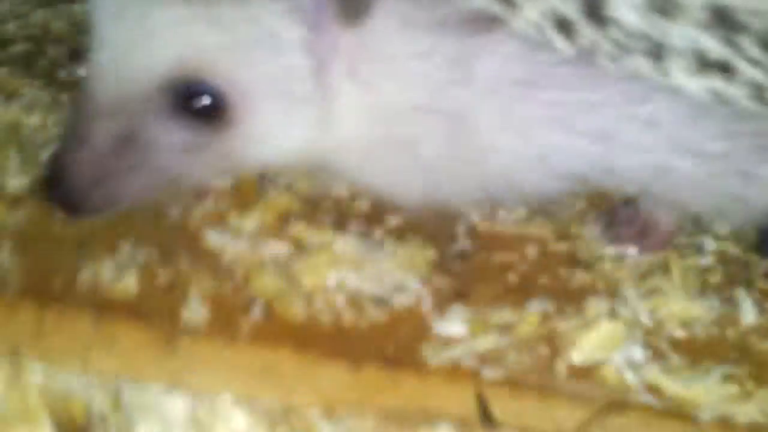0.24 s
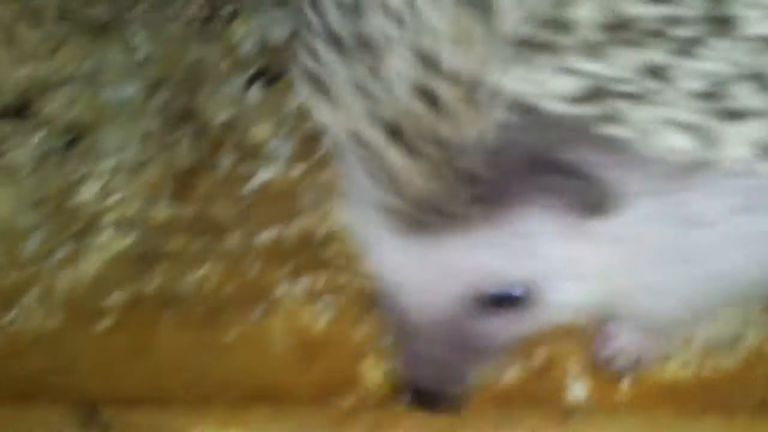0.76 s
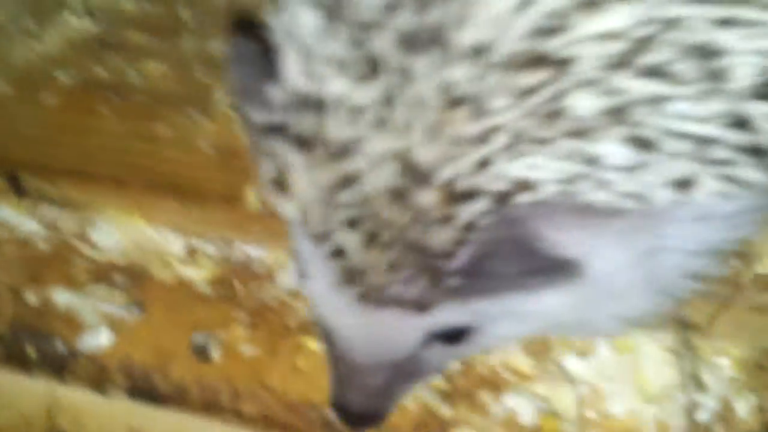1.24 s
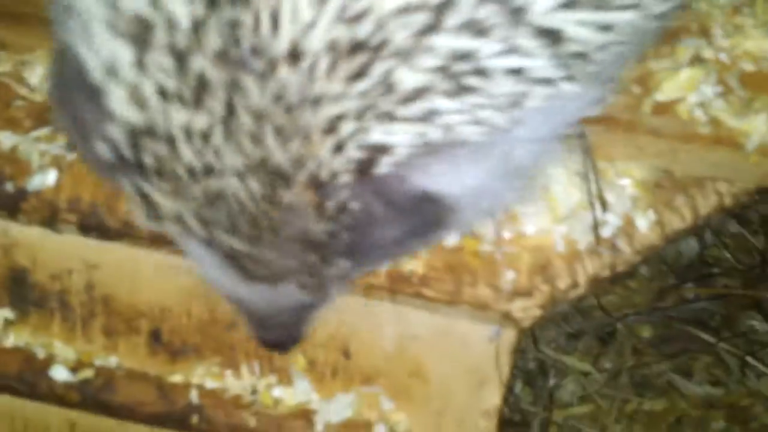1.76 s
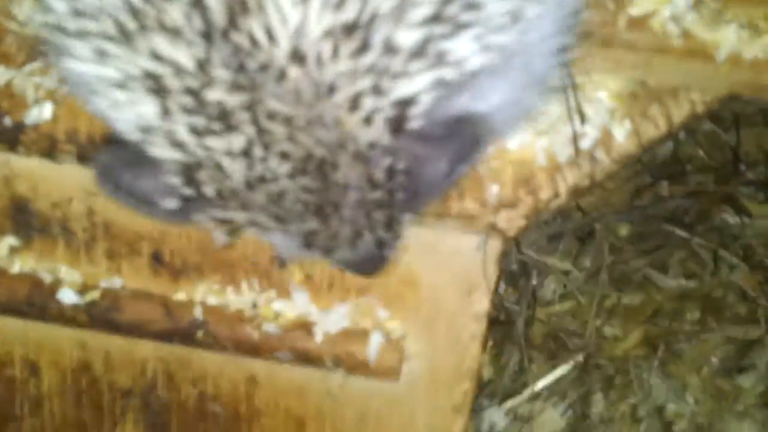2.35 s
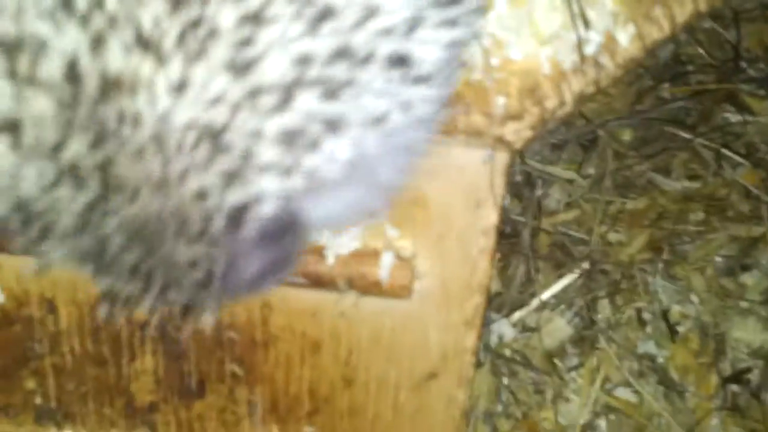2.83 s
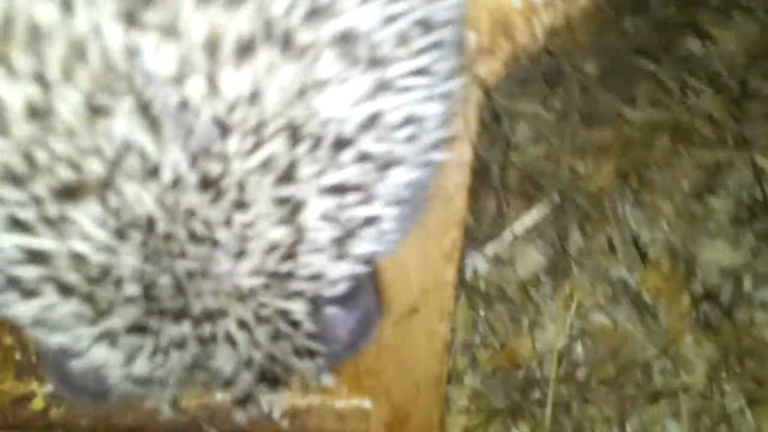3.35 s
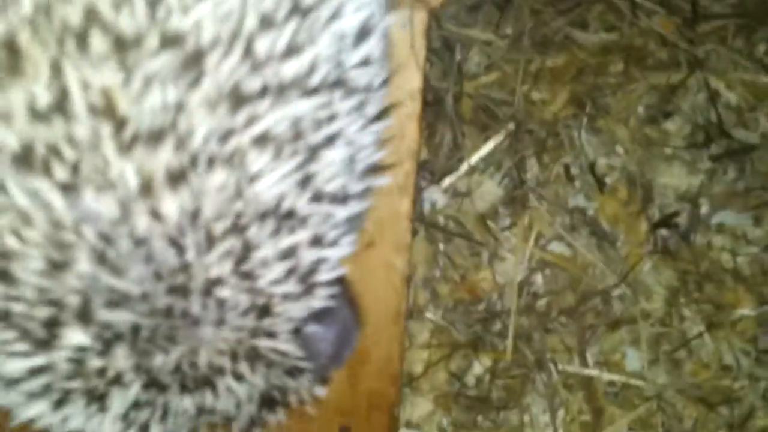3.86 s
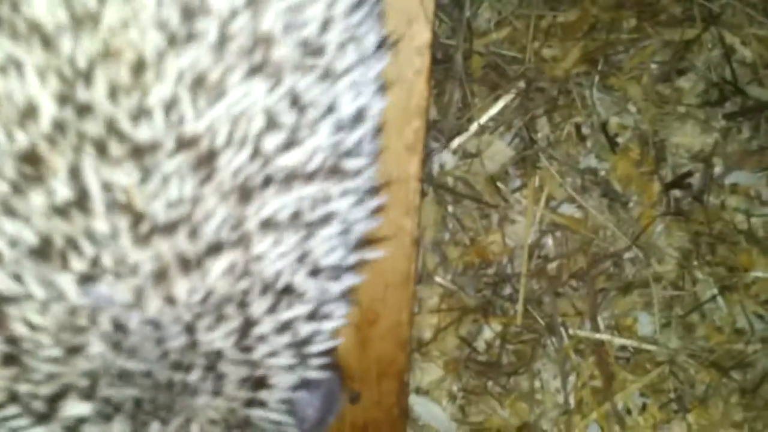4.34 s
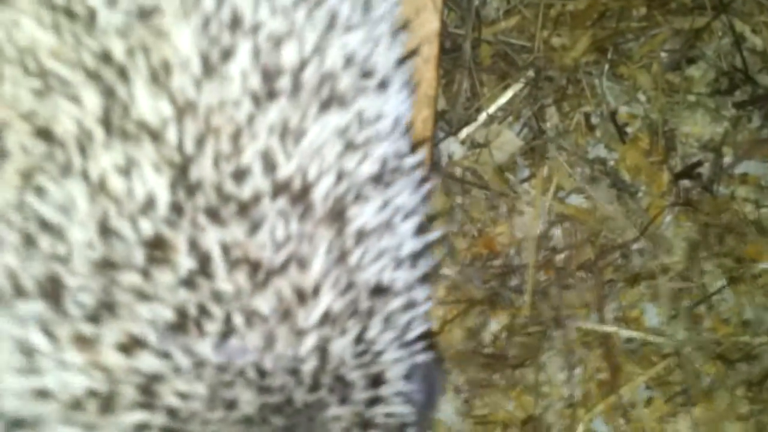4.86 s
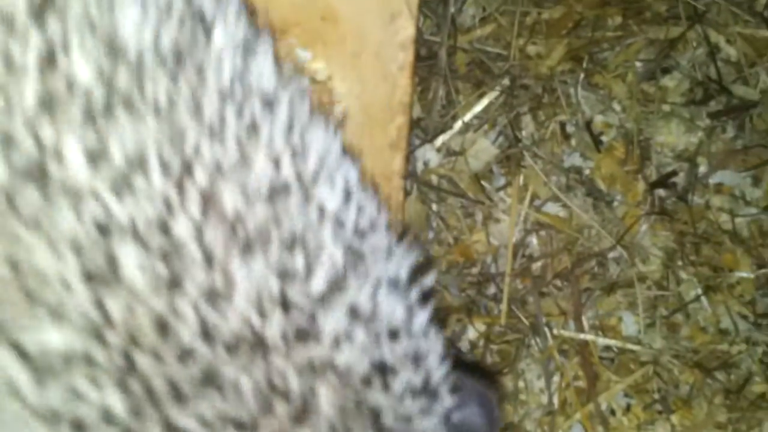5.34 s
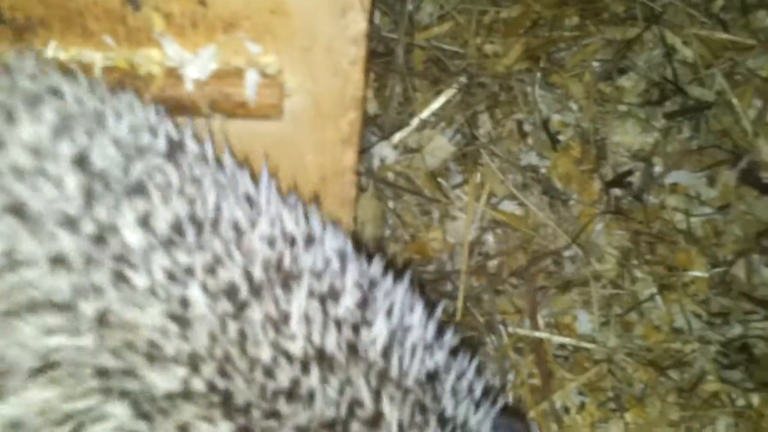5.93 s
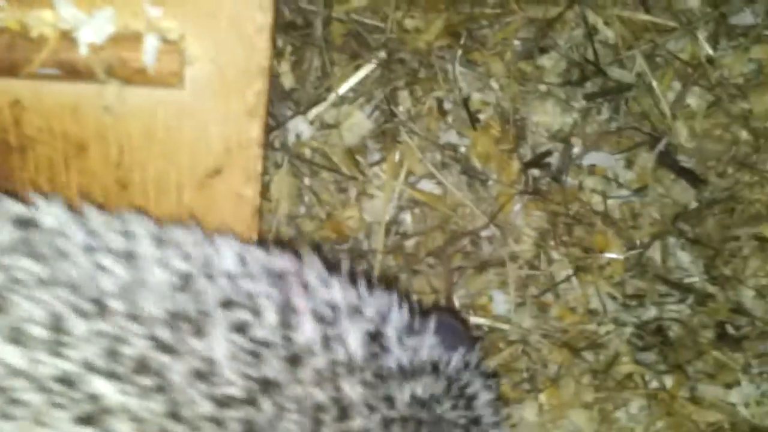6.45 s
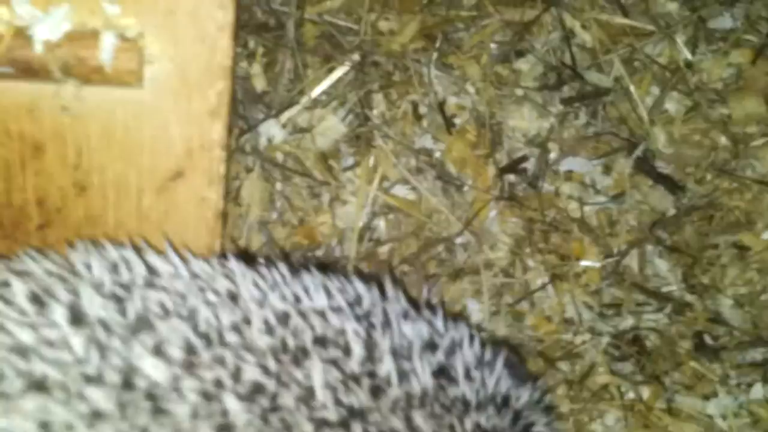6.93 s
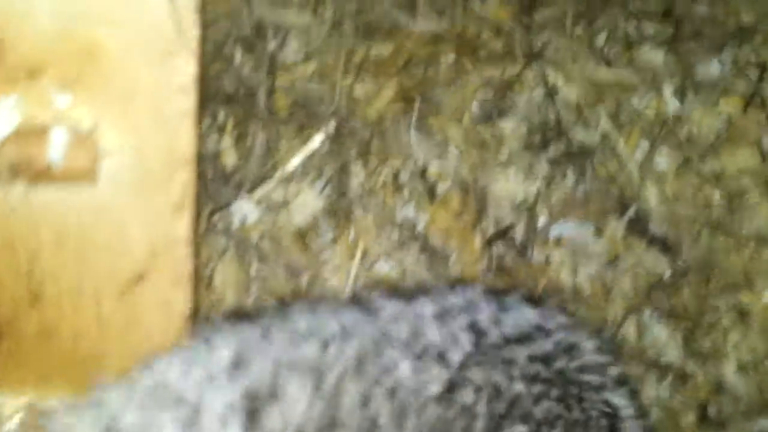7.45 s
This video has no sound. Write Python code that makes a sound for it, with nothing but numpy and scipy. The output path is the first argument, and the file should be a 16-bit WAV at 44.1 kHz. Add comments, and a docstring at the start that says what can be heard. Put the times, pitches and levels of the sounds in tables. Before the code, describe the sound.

A hedgehog stirs in dry wood shavings, making light crackles and small snaps. After about two and a half seconds it moves down a hollow wooden ramp, and irregular knocks, dragging scuffs and claw scratches join the rustling. Near the end, hay and chips snap in a quick cluster. The microphone is close, in a small pen with short echoes and a faint steady hiss.

```python
"""Hedgehog on a wooden ramp

A hedgehog shuffles down a hollow wooden ramp strewn with shavings, close to a two-port microphone.
Its weight drags and knocks on the board and makes it ring, its claws scratch it, and dry shavings
and hay rustle and snap. The walls of the pen add short echoes over a faint, steady hiss."""
import sys
import numpy as np
from scipy import signal
from scipy.io import wavfile
from scipy.ndimage import uniform_filter1d

SR = 44100
rng = np.random.default_rng(int(sys.argv[2]) if len(sys.argv) > 2 else 0)


def pcm_store(signal):
    """Save signal as 16-bit PCM."""
    levels = np.round(np.clip(np.atleast_2d(signal), -1, 1) * 32767)
    wavfile.write(sys.argv[1], SR, levels.astype(np.int16).T)


N = 339129
LEFT_LAG = 11  # samples by which the left port hears the animal later
WEIGHT, CLAWS, RUSTLE = range(3)  # the three parts of a scuff
# the notes (modes) of the hollow board: f/Hz, level/dB, time to fade 60 dB when left free/s
BOARD_MODES = [(129, -15.5, 0.95), (225.3, 2.5, 0.42), (255, 2.5, 0.58), (338.6, 3, 0.37), (397, 2.5, 0.42),
               (460.8, 5, 0.17), (578, -2, 0.56), (666.6, 5.5, 0.2), (739, 3, 0.25), (905, 9.5, 0.045),
               (985, -1.5, 0.3), (1196, -14.5, 0.25), (1305, -1.5, 0.13)]


def gain_of(db):
    """Turns decibels into a gain."""
    return 10 ** (np.asarray(db) / 20)


def unit_rms(x):
    """Scales a signal to an average power of 1."""
    return x / np.sqrt(np.mean(x ** 2) + 1e-20)


def value_at(points, hz):
    """Looks up a table of frequencies and values at hz."""
    f, value = np.transpose(points)
    return np.interp(np.log(hz + 1), np.log(f + 1), value)


def add(mix, start_s, sound):
    """Lays a two-channel sound into the mix."""
    part = mix[:, round(start_s * SR):][:, :sound.shape[1]]
    part += sound[:, :part.shape[1]]


def ports(common, own, share):
    """The right port hears the common sound; the left hears it late, mixed with a sound of its own."""
    return np.array([share * np.roll(common, LEFT_LAG) + np.sqrt(1 - share ** 2) * own, common])


def wander(size):
    """A random curve that changes over about size samples."""
    return unit_rms(uniform_filter1d(uniform_filter1d(rng.standard_normal(N), size), size))


def clumps(size, depth_db):
    """Stick and slip: a random gain that jumps up and sags over about size samples."""
    jumps = rng.random(N) * (rng.random(N) < 1 / size)
    sagging = unit_rms(signal.lfilter([1], [1, -np.exp(-1 / size)], jumps))
    return unit_rms(gain_of(depth_db * np.fmin(sagging, 2)))


def slips(per_s, spread_db, count):
    """Rows of tiny random clicks, most small and a few large."""
    size = gain_of(spread_db * np.fmin(rng.exponential(1, (count, N)), 4))
    return unit_rms(size * rng.choice([-1., 1.], (count, N)) * (rng.random((count, N)) < per_s / SR))


def gliding_ring(x, hz, width_hz, order):
    """Makes x ring at a pitch that follows the curve hz."""
    turn, decay = np.exp(2j * np.pi * np.cumsum(hz) / SR), np.exp(-np.pi * width_hz / SR)
    return 2 * (turn * signal.lfilter([(1 - decay) ** order], np.poly([decay] * order), x / turn)).real


def chip_band(x, hz):
    """Keeps a broad band around the pitch of a wood chip."""
    angle = 2 * np.pi * hz / SR
    decay = np.exp(-angle)
    return np.sqrt(1 - decay) * signal.lfilter([1, 0, -1], [1, -2 * decay * np.cos(angle), decay ** 2], x)


def effort_db(part, delayed=True):
    """How hard the weight, claws or rustle act at each sample: the body's stir plus all paw scuffs."""
    # low stir of the body between scuffs: t/s, level on the board/dB, level in the shavings/dB
    stir = [(0.0, -68, -52.5), (.2, -72, -56), (0.239, -70, -75), (.75, -101, -103), (1.0, -64.5, -69),
            (2.75, -63.5, -65), (3.4, -58.5, -64), (4.3, -59, -61), (5.4, -59, -66), (5.746, -53.5, -61),
            (6.4, -73, -67), (6.95, -58.5, -57.5), (7.45, -65, -62), (7.69, -59, -62.5)]
    # paws scuffing the board: start/s, length before stretching/s, weight/dB, claws/dB, rustle/dB
    scuffs = [(0.338, 0.13, -63, -60, -60.5), (0.439, 0.11, -59, -62, -55), (0.587, 0.075, -85, -87, -51.5),
              (0.836, 0.14, -59.5, -71, -58), (1.275, 0.064, -58.5, -55.5, -68),
              (1.499, 0.022, -53, -55.5, -61), (1.924, 0.03, -51, -54, -68),
              (1.958, 0.13, -49.5, -52, -53.5), (2.935, 0.06, -39.5, -41.5, -54),
              (3.037, 0.12, -40, -54.5, -80), (3.167, 0.016, -43.5, -50, -54),
              (3.206, 0.1, -44, -45.5, -54), (3.487, 0.061, -45, -53, -57.5),
              (3.556, 0.051, -39, -40.5, -56), (3.634, 0.1, -39, -50.5, -78), (3.746, 0.11, -52, -56, -55),
              (3.777, 0.49, -46, -55, -74), (3.938, 0.034, -38, -41, -51),
              (4.358, 0.098, -45.5, -48.5, -80), (4.482, 0.17, -51.5, -53.5, -49.5),
              (4.585, 0.057, -46, -38.5, -50), (4.888, 0.077, -42.5, -39.5, -50),
              (5.078, 0.13, -45, -60, -53), (5.165, 0.12, -38.5, -43.5, -48),
              (5.245, 0.065, -46, -42.5, -43.5), (5.466, 0.12, -45.5, -50.5, -52.5),
              (5.799, 0.12, -46, -46, -56.5), (5.974, 0.076, -51, -45.5, -55),
              (6.035, 0.098, -38, -40, -48.5), (6.1, 0.24, -48, -52.5, -52), (6.277, 0.089, -44, -41, -59),
              (6.4, 0.39, -49.5, -52, -51), (6.548, 0.1, -42.5, -44.5, -64),
              (6.775, 0.072, -44.5, -49.5, -51), (6.859, 0.1, -46, -53.5, -61.5),
              (7.155, 0.13, -54.5, -57, -62)]
    # factors that stretch a scuff's length: weight, claws, rustle
    stretch = [1.12, 0.79, 0.85]
    # the board answers a little after the shavings: weight/s, claws/s, rustle/s
    delay_s = [0.0024, 0.02, 0.0]
    # a paw first grips this far under its peak: weight/dB, claws/dB, rustle/dB
    grip_db = [-5.5, -9, -14]
    t = np.arange(0, N / SR + .01, .001)
    when, board_db, chips_db = np.transpose(stir)
    power = gain_of(2 * np.interp(t, when, [board_db, board_db - 4, chips_db][part]))
    for start, length, *levels_db in scuffs:
        age, span = t - start, length * stretch[part]
        peak_s = 0.29 * span + delayed * delay_s[part]
        rise_db = grip_db[part] * (1 - age / peak_s) ** 2
        fall_db = -14.5 * abs((age - peak_s) / span) ** 1.31  # holds first, then stops quickly
        shape_db = np.where(age < peak_s, rise_db, fall_db)
        power += (age >= 0) * gain_of(2 * (levels_db[part] + shape_db))
    return np.interp(np.arange(N) / SR, t, 10 * np.log10(power))


def hiss():
    """Steady room air and microphone noise, gently patchy."""
    # tone colour of the hiss: f/Hz, relative level/dB
    colour = [(49, -20.5), (110, 5), (200, 5), (462, -3.5), (1180, -8.5), (5800, -17.5), (11000, -16.5),
              (13800, -11.5), (15000, -31.5)]
    # how alike the hiss is left and right: f/Hz, likeness from 0 to 1
    likeness = [(60, 0.47), (500, 0.34), (1500, 0.014)]
    frames, hz = N // 256 + 5, np.fft.rfftfreq(1024, 1 / SR)
    left_re, left_im, own_re, own_im, patches = rng.standard_normal((frames, 513, 5)).T
    patches = unit_rms(uniform_filter1d(uniform_filter1d(patches, 12, 0), 14, 1))
    share = value_at(likeness, hz)[:, None]
    left = left_re + 1j * left_im
    right = share * left + np.sqrt(1 - share ** 2) * (own_re + 1j * own_im)
    spectra = np.array([left, right]) * gain_of(value_at(colour, hz)[:, None] + 2 * patches)
    return gain_of(-56) * unit_rms(signal.istft(spectra, nperseg=1024, noverlap=768)[1][:, :N])


def pen_echoes(x, fade_s=0.049):
    """The walls of the pen send back short, dense echoes, different at each port."""
    t = np.arange(8000) / SR
    echoes = rng.standard_normal((2, len(t))) * gain_of(-60 * t / fade_s) * (t > .002)
    return signal.oaconvolve(x, echoes / np.linalg.norm(echoes[0]), axes=1)[:, :N]


def rustle():
    """Dry shavings crackle in clumps; the tone wanders as other chips are stirred."""
    # tone colour of the shavings: f/Hz, relative level/dB
    colour = [(1500, -4.5), (3500, -6), (5200, -6), (8500, -5.5), (11000, -10), (14500, -24.5)]
    clicks = slips(per_s=9000, spread_db=3, count=2) * clumps(size=300, depth_db=3.5)
    hz, _, spectra = signal.stft(clicks, SR, nperseg=256)
    patches = rng.standard_normal(spectra.T.shape[:2]).T
    patches = unit_rms(uniform_filter1d(uniform_filter1d(patches, 16, 0), 24, 1))
    spectra *= gain_of(value_at(colour, hz)[:, None] + 2.1 * patches)
    crackle = unit_rms(signal.istft(spectra, nperseg=256)[1][:, :N]) * gain_of(effort_db(RUSTLE))
    return gain_of([[2.2], [4.8]]) * ports(*crackle, share=0.0061)


def snaps():
    """A stalk or chip breaks: a sharp click, a ring of a few cycles, then a brief scatter of echoes."""
    # stalks and chips that snap: t/s, level/dB, f/Hz
    breaks = [(0.0886, -31, 1450), (0.1082, -32, 2010), (0.475, -28.5, 1970), (1.012, -39.5, 1800),
              (1.8583, -33.5, 2960), (1.979, -44, 6000), (2.383, -36, 6840), (2.4265, -26.5, 3040),
              (2.665, -36, 5100), (3.8324, -35.5, 5400), (3.9445, -29, 4440), (4.3, -31.5, 3330),
              (4.82, -28, 7800), (5.28, -29, 4240), (6.598, -26.5, 7400), (6.606, -28, 6500),
              (6.622, -26, 5960), (6.659, -33, 2500), (6.716, -36, 2780)]
    t, out = np.arange(1500) / SR, np.zeros((2, N))
    for start_s, level_db, hz in breaks:
        ring = np.sin(2 * np.pi * hz * t) * np.exp(-t * hz / 1.2)
        crack = ring + 1.2 * rng.standard_normal(len(t)) * np.exp(-t / 0.0012)
        scatter = 0.2 * rng.standard_normal((2, len(t))) * np.exp(-t / 0.004)
        pair = np.array([np.roll(crack, LEFT_LAG), crack]) + scatter
        add(out, start_s, gain_of(level_db) * chip_band(pair, hz) / abs(chip_band(crack, hz)).max())
    return out


def claws():
    """Claws scrape through the chips and ring the surface in bands that drift, come and go."""
    # bands in which the surface rings: f/Hz, width/Hz, level/dB
    bands = [(1535, 1460, 12), (2195, 580, 10), (2524, 170, 4), (3040, 440, 4), (3980, 730, 6)]
    effort = gain_of(0.82 * effort_db(CLAWS, delayed=False) + .5 * effort_db(RUSTLE))
    push = slips(per_s=1800, spread_db=3.5, count=2) * effort
    out = np.zeros((2, N))
    for hz, width, db in bands:
        pitch = hz * (1 + 0.055 * wander(size=3000))
        scrape = push * clumps(size=1800, depth_db=7)
        out += gain_of(db) * np.sqrt(SR / width) * gliding_ring(scrape, pitch, width, order=2)
    return gain_of([[-1.2], [-2.8]]) * ports(*out, share=0.059)


def knocks(damping=1.7):
    """A paw or the body hits the board and rings its nearby notes; staying on it shortens the ring."""
    # blows on the board: t/s, level/dB, centre of the notes rung/Hz, their spread/octaves
    blows = [(.362, -38, 520, .6), (.475, -33.5, 670, .7), (.855, -46, 650, .8), (1.451, -47, 800, .4),
             (2.4272, -23, 340, .85), (2.447, -28.5, 360, .6), (2.549, -43, 800, .8), (2.82, -36, 380, .6),
             (2.931, -30, 420, .5), (3.052, -25, 450, 1), (3.064, -26, 360, .5), (3.337, -39, 800, .7),
             (3.44, -37, 465, .25), (3.559, -29, 600, .8), (3.943, -26, 750, 1), (4.3632, -31, 600, .8),
             (4.3655, -16, 600, 1.2), (4.384, -25, 800, .6), (4.397, -27, 550, 1), (4.82, -34, 470, .25),
             (5.065, -41, 470, .15), (5.281, -26, 472, .15), (5.487, -40, 750, .5), (6.657, -30, 465, .13),
             (6.715, -32.5, 465, .13), (6.775, -39, 900, .3)]
    hz, db, ring_s = np.transpose(BOARD_MODES)[:, :, None]
    t, out = np.arange(12000) / SR, np.zeros((2, N))
    attack = 1 - np.exp(-(t / .001) ** 2)
    for start_s, level_db, centre_hz, spread in blows:
        strength, detune, own_detune = rng.standard_normal((3, len(hz), 1))  # each spot rings differently
        reach_db = -6 * (np.log2(hz / centre_hz) / spread) ** 2
        thump = 3 * spread * np.exp(-t / .004)  # the first contact is stronger than the ring
        ring = gain_of(2.2 * strength - 60 * t * damping / ring_s)
        fade = gain_of(db + reach_db) * (ring + thump) * attack
        common = -(fade * np.cos(2 * np.pi * hz * (1 + 0.0277 * detune) * t)).sum(0)
        own = -(fade * np.cos(2 * np.pi * hz * (1 + 0.049 * own_detune) * t + detune)).sum(0)
        pair = ports(common, own, share=0.5) * gain_of([[-1.5], [0]])
        pair = signal.sosfilt(signal.butter(2, centre_hz / 4, "high", fs=SR, output="sos"), pair)
        add(out, start_s, gain_of(level_db) * pair / abs(pair.mean(0)).max())
    return out


def drag(low_modes=6):
    """Uneven slips ring the board: the body's weight drives its low notes, the claws its high ones."""
    # near the foot of the ramp the deepest notes are held still: t/s, tilt/dB per octave below 470 Hz
    bass_tilt = [(3.3, -3), (4.4, -20), (6.2, -12.5), (7.0, 0)]
    push = slips(per_s=1200, spread_db=3, count=6) * clumps(size=400, depth_db=1.5)
    weight, claw = gain_of(effort_db(WEIGHT)), gain_of(effort_db(CLAWS))
    tilt_db = np.interp(np.arange(N) / SR, *np.transpose(bass_tilt))
    out = np.zeros((2, N))
    for k, (hz, db, ring_s) in enumerate(BOARD_MODES):
        contact = push[[k % 3, 3 + k % 3]] * clumps(size=2500, depth_db=4.5)  # each favours other notes
        force = weight * gain_of(tilt_db * np.log2(470 / hz)) if k < low_modes else claw
        width = 2.1 / (0.33 * ring_s)  # the body damps the note
        pitch = hz * (1 + .04 * wander(size=4000))  # and pulls it out of tune
        out += gain_of(db) * np.sqrt(SR / width) * gliding_ring(contact * force, pitch, width, order=1)
    return gain_of([[-13], [-11.5]]) * ports(*out, share=0.74)


def scene():
    """The hedgehog, its echoes and the background hiss."""
    animal = drag() + claws() + rustle() + knocks() + snaps()
    bass_cut = signal.butter(3, 120, "high", fs=SR, output="sos")  # a small board gives off little bass
    animal = signal.sosfilt(bass_cut, animal)
    return animal + gain_of(-8) * pen_echoes(animal) + hiss()


def record(dry):
    """Cuts off the highest treble, above 14800 Hz."""
    return signal.oaconvolve(dry, signal.firwin(511, 14800, window=("kaiser", 9), fs=SR)[None], "same")


dry = scene()
out = record(dry)
pcm_store(out)
```